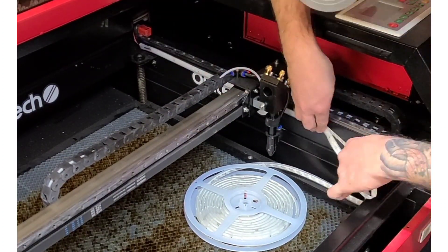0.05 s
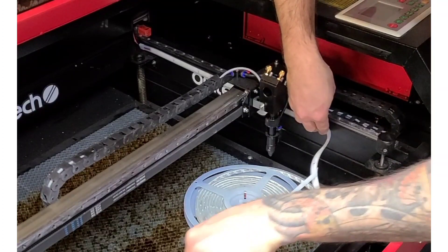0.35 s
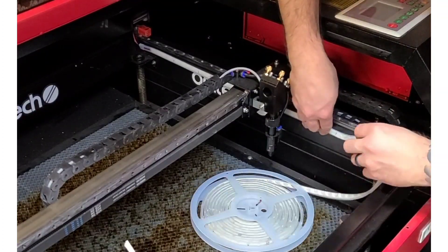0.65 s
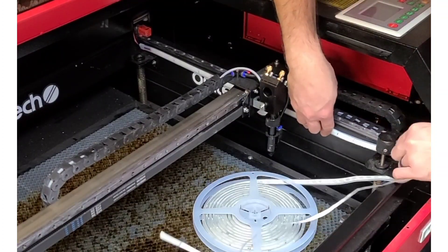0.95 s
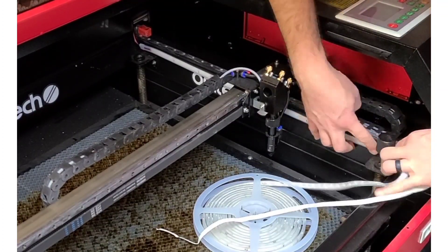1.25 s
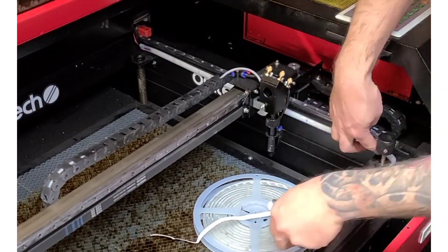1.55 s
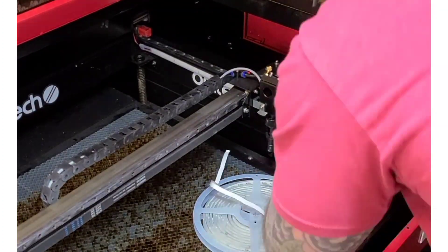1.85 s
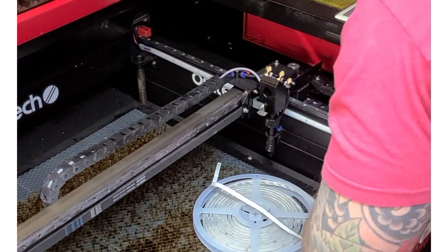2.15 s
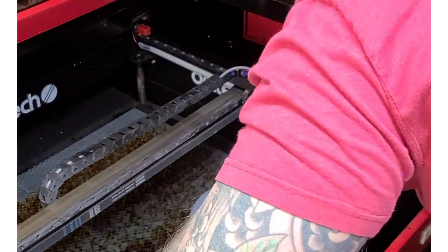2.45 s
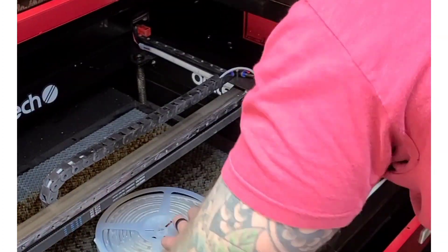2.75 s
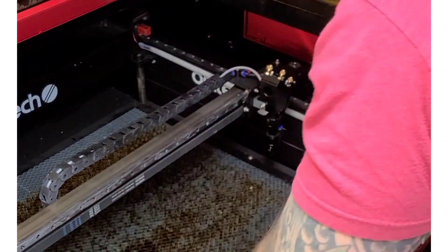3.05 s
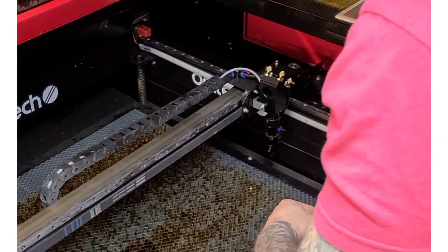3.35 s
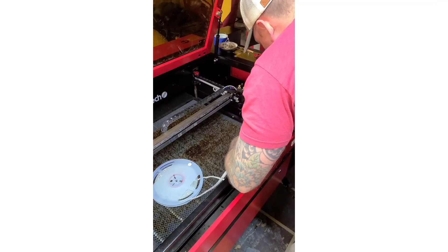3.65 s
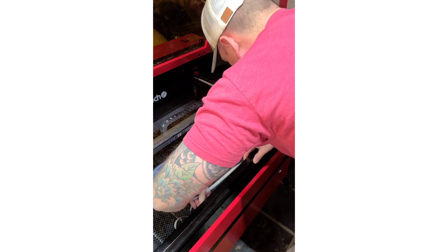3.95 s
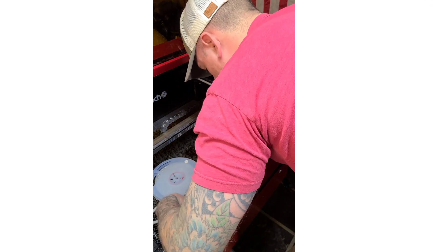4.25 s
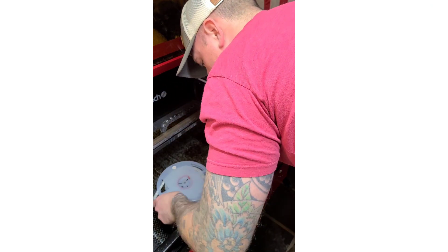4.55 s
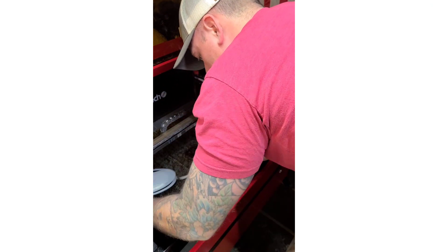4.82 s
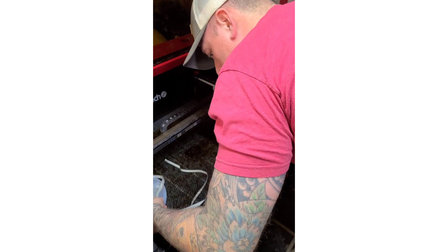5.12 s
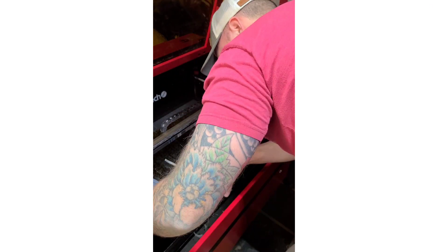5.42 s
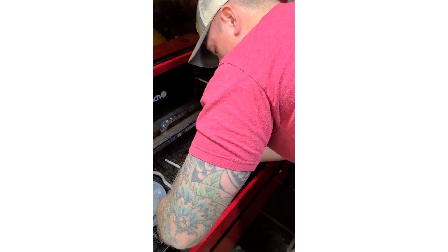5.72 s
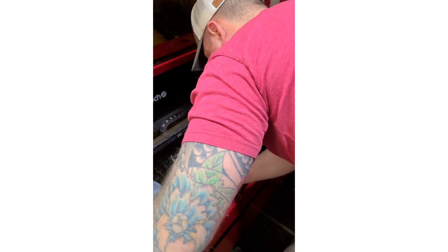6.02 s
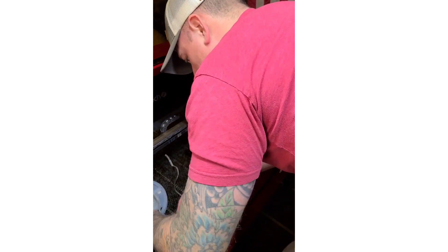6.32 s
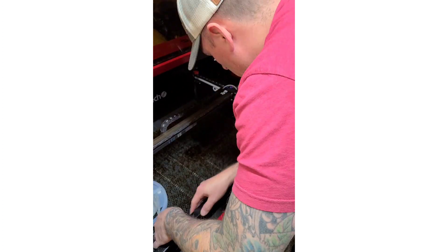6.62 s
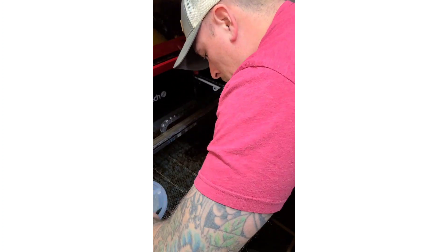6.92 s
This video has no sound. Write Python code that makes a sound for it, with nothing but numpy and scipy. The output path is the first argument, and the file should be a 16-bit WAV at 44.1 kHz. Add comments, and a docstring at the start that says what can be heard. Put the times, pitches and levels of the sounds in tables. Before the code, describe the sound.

Short hollow plastic rasps, light swishes and soft bumps inside a machine cabinet, with one sharp clack and a low hum.

```python
"""A faint rustle and short, hollow rasps come first, over a low fan hum, rumble and microphone hiss.
A silicone light strip is pulled off a plastic reel and routed inside an idle laser cutter's steel cabinet.
Stick-slip friction makes the reel scrape on the honeycomb bed and the strip swish, tick and squeak once.
Hands bump the panels softly and excite their modes; near 5 s the reel drops onto the bed with a clack."""
import sys
import numpy as np
from scipy import signal
from scipy.fft import rfft, irfft, next_fast_len
from scipy.io import wavfile

SR = 44100
rng = np.random.default_rng(int(sys.argv[2]) if len(sys.argv) > 2 else 0)


def put_to_file(sound):
    """Save the sound as 16-bit audio at rate SR, in the file named by the first command-line argument."""
    columns = np.atleast_2d(sound).T  # one column per channel
    safe = np.clip(columns, -1, 1)
    whole_steps = np.round(safe * 32767)
    wavfile.write(sys.argv[1], SR, whole_steps.astype(np.int16))


N = 307818
TIME = np.arange(N) / SR


def from_db(db):
    return 10 ** (np.asarray(db) / 20)


def unit_rms(x):
    return x / np.sqrt(np.mean(x ** 2) + 1e-20)


def add(out, sound, start_s):
    """Superposition: a sound joins the mix at its start time."""
    at = int(start_s * SR)
    out[..., at:at + sound.shape[-1]] += sound


def coloured(x, points):
    """Spectral shaping by a gain curve through (Hz, dB) points."""
    hz, db = np.transpose(points)
    length = x.shape[-1]
    size = next_fast_len(length + 2048)
    bin_hz = np.arange(size // 2 + 1) * SR / size
    gain = from_db(np.interp(np.log(bin_hz + 1), np.log(hz), db))
    return irfft(rfft(x, size) * gain, size)[..., :length]


def band(x, low_hz, high_hz, order=2):
    return signal.sosfilt(signal.butter(order, [low_hz, high_hz], "band", fs=SR, output="sos"), x + 1e-18)


def drift(knots_per_s):
    """Slow random modulation of unit RMS."""
    knots = rng.standard_normal(int(N / SR * knots_per_s) + 2)
    return unit_rms(np.interp(TIME * knots_per_s, np.arange(len(knots)), knots))


def stereo_noise(side_db):
    """Partial coherence: white noise common to both ears, plus a part in antiphase."""
    mid, side = rng.standard_normal((2, N))
    return mid + from_db(side_db) * side * [[1], [-1]]


# Hiss spectra of the two microphones. Each row: frequency in Hz, relative level in dB.
HISS_LEFT = [(500, -7), (2500, -10.5), (5300, -14.5), (6300, -7), (7100, 2.5), (7900, -4), (8900, -23.5),
             (10500, -19), (13000, -6.5), (15300, -10.5)]
HISS_RIGHT = [(500, -9), (2500, -9), (5300, -13.5), (6300, -7.5), (7000, -3), (7600, -10.5), (8400, -26),
              (10500, -14), (12000, -6), (15300, -19.5)]
def hiss(level_db):
    """Self-noise: each microphone hisses independently, coloured by its port."""
    ears = np.array([coloured(rng.standard_normal(N), port) for port in (HISS_LEFT, HISS_RIGHT)])
    return from_db(level_db) * unit_rms(ears)


# Course of the duct rumble. Each row: time in seconds, level in dB before the rumble's gain.
RUMBLE_LEVELS = [(0.0, -74.5), (1.38, -74), (2.57, -68), (2.8, -57), (3.26, -62.5), (4.1, -59), (6.98, -62)]
# Spectra of the rumble and the rushing air. Each row: frequency in Hz, relative level in dB.
RUMBLE_SPECTRUM = [(20, -18), (45, -7), (82, 3), (104, -5), (126, 0.5), (165, -9.5), (220, -12),
                   (320, -24.5), (600, -67)]
RUSH_SPECTRUM = [(150, -6.5), (300, 0), (450, 3.5), (590, -2), (720, 2), (900, -0.5), (1100, -7.5),
                 (1600, -8), (2500, -28), (6000, -32)]
# Hum of the fan. Each row: frequency in Hz, level in dB.
FAN_TONES = [(119, -80), (134, -80.5), (722, -89.5), (380, -96)]
def fan(rumble_gain_db, rush_db, rush_follows, waver_db):
    """Broadband plus tonal noise: duct rumble, rushing air that partly follows it, and unsteady tones."""
    level_db = np.interp(TIME, *np.transpose(RUMBLE_LEVELS))
    rumble = unit_rms(coloured(stereo_noise(side_db=-16.0), RUMBLE_SPECTRUM))
    rush = unit_rms(coloured(stereo_noise(side_db=-3.5), RUSH_SPECTRUM))
    rush_gain = from_db(rush_db + rush_follows * (level_db - level_db.mean()))
    hum = 0
    for hz, db in FAN_TONES:
        amplitude = np.sqrt(2) * from_db(db + waver_db * drift(2.3))
        hum += amplitude * np.sin(2 * np.pi * hz * TIME + 0.63 * drift(5.5))
    return from_db(level_db + rumble_gain_db) * rumble + rush_gain * rush + hum


# Modes of cabinet and bed. Each row: frequency in Hz, gain in dB, T60 in seconds before the limit below.
PANEL_MODES = [(80.4, -2, 0.038), (130, -14, 0.054), (245, 4, 0.033), (433, 3, 0.023), (475, -8, .06),
               (688, -0.5, 0.059), (843, 0, .07), (1038, -1, 0.17), (1324, -4, 0.027), (1683, 0, .05),
               (1876, -2.5, .05), (2270, -7.5, 0.15), (2560, -5, 0.18), (2720, -3, 0.042),
               (3200, -2, 0.013), (3560, -7, .04), (4750, -8, 0.024)]
def panels(force, longest_t60_s=.075):
    """Modal resonance: the panel modes ring briefly in parallel, each decay limited to longest_t60_s."""
    out = 0
    for hz, db, t60 in PANEL_MODES:
        radius = from_db(-60 / (min(t60, longest_t60_s) * SR))
        gain = (1 - radius ** 2) / 2
        feedback = [1, -2 * radius * np.cos(2 * np.pi * hz / SR), radius ** 2]
        out += from_db(db) * signal.lfilter([gain, 0, -gain], feedback, force + 1e-18)
    return out


def thud(peak_db, hz, contact_s, width, direct_db=-18.0):
    """Forced vibration: a brief, uneven push excites the panel modes near its own pitch."""
    t = TIME[:SR // 4]
    push = rng.standard_normal(len(t)) * (t / contact_s) * np.exp(-2 * t / contact_s)
    force = band(push, hz / (1 + width), hz * (1 + width))
    sound = panels(force) + from_db(direct_db) * force
    return from_db(peak_db) * sound / np.abs(sound).max()


# Hands on the panels. Each row: start in seconds, peak in dB, favoured pitch in Hz, contact in seconds.
BUMPS = [(0.892, -51, 230, 0.02), (.99, -65, 1450, 0.014), (1.02, -62, 260, .0065), (1.21, -67, 216, .024),
         (1.226, -65, 1720, 0.0088), (1.583, -44.5, 500, .003), (1.661, -50, 517, 0.0052),
         (1.762, -57.5, 520, .011), (1.901, -52.5, 70, .041), (2.35, -53.5, 696, .019),
         (2.544, -46, 620, .012), (2.747, -46, 83, .022), (2.941, -46, 1000, .013),
         (2.993, -44.5, 157, .0052), (4.685, -51.5, 260, .018), (5.432, -50, 238.6, .012),
         (6.063, -54, 1050, .0076), (6.526, -46.5, 430, .01)]
def hand_bumps(octave_contact_s):
    """Time-bandwidth reciprocity: shorter bumps excite wider bands, +/-1 octave at octave_contact_s."""
    out = np.zeros(N + SR)
    for start_s, peak_db, hz, contact_s in BUMPS:
        width = np.clip(octave_contact_s / contact_s, .15, 1.5)
        add(out, thud(peak_db, hz, contact_s, width), start_s)
    return out[:N]


# Level difference between the ears. Each row: frequency in Hz, left minus right in dB.
EAR_BALANCE = [(300, -1), (1500, 0), (3500, -2.5), (6500, -5.5), (8300, 1), (11500, -8.5), (15000, -2)]
def cabinet(x, t60_s, direct_db, shifts_per_s, apart_hz=800, left_delay_s=.00015):
    """Reverberation between close steel walls: dense reflections that shift as the contact travels."""
    t, echo_t = TIME[:len(x)], TIME[:SR // 14]
    # the work lies to the right, so its direct sound reaches the left ear later
    delayed = np.interp(t - np.round(left_delay_s * SR) / SR, t, x)
    ears = np.array([delayed, x]) * from_db(direct_db)
    travel = np.pi / 2 * shifts_per_s * t
    for nearness in (np.cos(travel), np.sin(travel)):
        response = rng.standard_normal((2, len(echo_t))) * from_db(-60 * echo_t / t60_s)
        mid, side = response / np.sqrt(np.sum(response ** 2, axis=1, keepdims=True))
        # long waves reach both ears alike
        side = signal.lfilter(*signal.butter(1, apart_hz, "high", fs=SR), side)
        ears += signal.fftconvolve((x * nearness)[None], mid + side * [[1], [-1]], axes=1)[:, :len(x)]
    left = coloured(ears[0], [(hz, db / 2) for hz, db in EAR_BALANCE])
    right = coloured(ears[1], [(hz, -db / 2) for hz, db in EAR_BALANCE])
    return np.array([left, right])


def friction(size, spread_db, rub_db, catches_per_s=2200):
    """Roughness noise: tiny random catches, as on the bed's cell edges, over a smooth rub."""
    strengths = from_db(spread_db * np.minimum(rng.exponential(1, size), 3))
    signs = rng.choice([-1, 1], size)
    catches = strengths * signs * (rng.random(size) < catches_per_s / SR)
    return unit_rms(unit_rms(catches) + from_db(rub_db) * rng.standard_normal(size))


# Colour of all rubbing contacts. Each row: frequency in Hz, gain in dB.
FRICTION_SPECTRUM = [(60, -11.5), (150, -11), (240, -4.5), (330, -16), (460, -4.5), (600, -5), (1000, 0),
                     (2500, -2), (3700, 1), (5000, -0.5), (7000, -1.5), (8800, -10), (10500, -2),
                     (12300, -1.5), (15800, -9.5)]
# Edges in Hz of four bands, from low to high: body, ring, scratch and sizzle.
BAND_EDGES = [60, 1000, 2200, 8000, 16000]
# Activity of the fingers. Each row: time in seconds, rustle level in dB.
RUSTLE_LEVELS = [(0, -84), (.35, -79), (1.25, -74.5), (1.7, -68), (1.9, -89), (2.2, -78), (2.37, -58.5),
                 (2.57, -65.5), (2.73, -78), (3.5, -88), (3.9, -71), (4.6, -75.5), (4.9, -66), (5.08, -84),
                 (5.85, -78), (6.2, -83), (6.45, -72.5), (6.7, -82)]
def finger_rustle(clump_db, flicker_db, panel_db):
    """Modulated friction: fingers brush the strip in clumps, and each band also flickers on its own."""
    clumps_db = clump_db * drift(35)
    brush = 0
    for low, high in zip(BAND_EDGES[1:], BAND_EDGES[2:]):
        force = friction(N, spread_db=5.0, rub_db=-2.5)
        brush += band(force * from_db(clumps_db + flicker_db * drift(30)), low, high)
    radiated = coloured(brush + from_db(panel_db) * panels(brush), FRICTION_SPECTRUM)
    ears = cabinet(radiated, t60_s=0.014, direct_db=-1.5, shifts_per_s=12)
    return from_db(np.interp(TIME, *np.transpose(RUSTLE_LEVELS))) * unit_rms(ears)


def slip(peak_s, rise_s, fall_s, scratch_db, shares_db, part_hz, pan_db, part_db=2.5, panel_db=-0.5):
    """Stick-slip: the grip swells and lets go, ringing the touched part and panels. Gives sound, start."""
    lead_s, band_ratio = .115, 1.22
    t = TIME[:SR // 4] - lead_s
    # the grip is 20 dB down at rise_s before its peak and at fall_s after it
    from_peak = np.abs(t / np.where(t < 0, rise_s, fall_s))
    grip = from_db(-20 * np.minimum(from_peak ** 1.5, 10))
    force = grip * friction(len(t), spread_db=3.5, rub_db=-5)
    force += from_db(part_db) * band(force, part_hz / band_ratio, part_hz * band_ratio, order=1)
    radiated = coloured(force + from_db(panel_db) * panels(force), FRICTION_SPECTRUM)
    ears = cabinet(radiated, t60_s=0.045, direct_db=-3.5, shifts_per_s=70.4)
    # contact hardness shares out the energy; shares are relative to the scratch band
    body_db, ring_db, sizzle_db = shares_db
    sound = sum(from_db(db) * unit_rms(band(ears, low, high, order=3))
                for low, high, db in zip(BAND_EDGES, BAND_EDGES[1:], (body_db, ring_db, 0, sizzle_db)))
    level = np.sqrt(np.mean(grip ** 2)) * from_db(scratch_db)
    pan = from_db([[pan_db / 2], [-pan_db / 2]])
    return sound * level * pan, peak_s - lead_s


# Ticks of the strip. Each row: peak time and fall in seconds, scratch level in dB, sizzle share in dB.
TICKS = [(0.441, 0.013, -58, 5.5), (.768, 0.011, -68, 11.5), (1.42, 0.022, -64, 8), (1.553, 0.019, -61, 6),
         (3.776, 0.0073, -58.5, -3), (4.17, 0.006, -63.5, 19), (4.453, .003, -53, 2),
         (4.928, .025, -46, -1), (5.78, 0.013, -61.5, 2), (6.498, 0.01, -56, 7), (6.908, .016, -70.5, 8)]
def strip_ticks(rise_s, body_db, ring_db, strip_hz, pan_db):
    """Transient excitation: the strip meets an edge in sudden, thin slips with hardly any body."""
    out = np.zeros((2, N + SR))
    for peak_s, fall_s, db, sizzle_db in TICKS:
        add(out, *slip(peak_s, rise_s, fall_s, db, (body_db, ring_db, sizzle_db), strip_hz, pan_db))
    return out[:, :N]


# Slides of the strip. Each row: peak time and rise or fall in seconds, scratch level and brightness in dB.
SWISHES = [(.378, 0.029, -64, 1), (1.767, 0.038, -53.5, 2), (3.885, 0.036, -70.5, 10.5),
           (4.76, 0.054, -48, -1), (4.817, 0.027, -41, -1.5), (6.136, 0.019, -67, 1),
           (6.328, 0.025, -60.5, -3.5), (6.418, 0.026, -46.5, -2), (6.513, 0.0094, -46.5, 6.5),
           (6.578, 0.017, -63.5, 5.5)]
def strip_swishes(body_db, ring_db, sizzle_db, strip_hz, pan_db):
    """Sliding friction: the strip runs through the fingers, swelling and fading evenly."""
    out = np.zeros((2, N + SR))
    for peak_s, ramp_s, db, bright_db in SWISHES:
        shares_db = (body_db, ring_db - bright_db, sizzle_db + bright_db)
        add(out, *slip(peak_s, ramp_s, ramp_s, db, shares_db, strip_hz, pan_db))
    return out[:, :N]


def strip_squeak(peak_s, rise_s, fall_s, scratch_db, shares_db, pitch_hz, pan_db):
    """Band-limited stick-slip: one short slip of silicone, its energy gathered around one pitch."""
    out = np.zeros((2, N + SR))
    add(out, *slip(peak_s, rise_s, fall_s, scratch_db, shares_db, pitch_hz, pan_db))
    return out[:, :N]


# Scrapes on the bed. Each row: peak time, rise and fall in seconds,
# then scratch level, body share and brightness in dB.
SCRAPES = [(.313, 0.013, 0.012, -70.5, 0, 11), (.609, 0.03, 0.03, -48, -20, 0),
           (0.634, 0.019, 0.012, -37, -21.5, 0), (.676, 0.011, 0.033, -45.5, -17.5, 0),
           (.724, 0.027, 0.02, -56, -16, -0.5), (1.672, 0.014, .022, -48.5, 5, -1.5),
           (2.256, 0.019, 0.028, -45, -18.5, -0.5), (2.283, 0.02, 0.015, -46.5, -13, 1.5),
           (2.377, 0.019, 0.0055, -52, -1.5, -1), (2.512, 0.029, 0.046, -58.5, -5, -1.5),
           (2.6, 0.022, 0.082, -49, -6.5, -2.5), (2.63, 0.019, 0.037, -34, -18, 2.5),
           (2.652, 0.019, 0.026, -27.5, -11, 0.5), (2.68, .017, 0.0091, -33, -9.5, -1.5),
           (2.765, 0.021, 0.17, -53.5, -7, -4), (2.835, .036, 0.048, -40, -17, 3),
           (2.864, 0.024, 0.02, -24, -14, 3.5), (2.907, 0.032, 0.02, -29, -8.5, -1),
           (2.95, 0.026, 0.044, -44, -1, -0.5), (2.997, 0.027, 0.024, -47, -3.5, 1),
           (4.282, 0.026, .016, -64.5, -6.5, 0.5), (4.353, 0.02, 0.023, -68.5, 4.5, -4.5),
           (4.396, 0.018, 0.011, -69.5, 6, -9.5), (4.54, 0.067, 0.062, -58.5, -11, 3),
           (4.661, 0.024, 0.076, -57, -2.5, 2.5), (4.84, 0.043, 0.048, -43.5, -14, 3),
           (4.906, 0.023, 0.034, -42, -2, -1), (5.163, 0.015, 0.019, -50.5, -9.5, -0.5),
           (5.425, 0.028, 0.025, -67, 5.5, -2.5), (5.628, 0.014, 0.023, -52, -0.5, -11),
           (5.672, .022, 0.026, -55.5, 3.5, -5.5), (5.81, 0.014, 0.037, -54.5, 1.5, -5)]
def reel_scrapes(ring_db, sizzle_db, sizzle_follows, reel_hz, pan_db):
    """Friction-driven resonance: the reel rasps hollowly, and brighter scrapes trade ring for sizzle."""
    out = np.zeros((2, N + SR))
    for peak_s, rise_s, fall_s, db, body_db, bright_db in SCRAPES:
        shares_db = (body_db, ring_db - bright_db, sizzle_db + sizzle_follows * bright_db)
        add(out, *slip(peak_s, rise_s, fall_s, db, shares_db, reel_hz, pan_db))
    return out[:, :N]


# The reel tips, lands and settles. Each row: peak time, rise and fall in seconds,
# then scratch level, brightness and left-minus-right pan in dB.
LANDING = [(4.954, 0.0033, 0.035, -31, 3.5, -1.5), (4.975, 0.0031, .011, -13.5, 1.5, -2.5),
           (4.982, .008, .013, -13.5, -1, 3.5), (5.007, 0.011, .008, -43, 1.5, -6)]
def reel_clack(drop_s, body_db, ring_db, sizzle_db, reel_hz, contact_s, width):
    """Impact excitation: a few hard contacts, with a thud and a knock as the full weight meets the bed."""
    out = np.zeros((2, N + SR))
    for peak_s, rise_s, fall_s, db, bright_db, pan_db in LANDING:
        shares_db = (body_db, ring_db - bright_db / 2, sizzle_db + bright_db)
        add(out, *slip(peak_s, rise_s, fall_s, db, shares_db, reel_hz, pan_db))
    bed_thud = thud(peak_db=-30, hz=213, contact_s=contact_s, width=width)
    reel_knock = thud(peak_db=-15.5, hz=1050, contact_s=contact_s, width=width)
    add(out, bed_thud + reel_knock, drop_s)
    return out[:, :N]


def scene():
    """Superposition: reel, strip, hands and fan add up at a pair of slightly hissy microphones."""
    reel = reel_scrapes(ring_db=2.0, sizzle_db=-5.5, sizzle_follows=0.8, reel_hz=1451, pan_db=-0.26)
    reel += reel_clack(drop_s=4.974, body_db=-15, ring_db=-4.0, sizzle_db=-2.5, reel_hz=1410,
                       contact_s=0.0027, width=.22)
    strip = strip_swishes(body_db=-17, ring_db=-5.5, sizzle_db=-2.5, strip_hz=6400, pan_db=-0.7)
    strip += strip_ticks(rise_s=0.0023, body_db=-15.5, ring_db=-8.5, strip_hz=6550, pan_db=-2.0)
    strip += strip_squeak(peak_s=1.815, rise_s=0.015, fall_s=0.013, scratch_db=-50.5,
                          shares_db=(-30, -10.5, -31), pitch_hz=3900, pan_db=-1.0)
    hands = finger_rustle(clump_db=3.0, flicker_db=2.5, panel_db=-8.5) + hand_bumps(octave_contact_s=.0035)
    air = fan(rumble_gain_db=1.35, rush_db=-75, rush_follows=.33, waver_db=2.0)
    return reel + strip + hands + air + hiss(level_db=-76.5)


def record(dry):
    """Band limiting: a steep low-pass filter removes the highest treble."""
    cutoff_hz = 15900
    return signal.sosfilt(signal.ellip(12, .1, 80, cutoff_hz, fs=SR, output="sos"), dry)


dry = scene()
out = record(dry)
put_to_file(out)
```